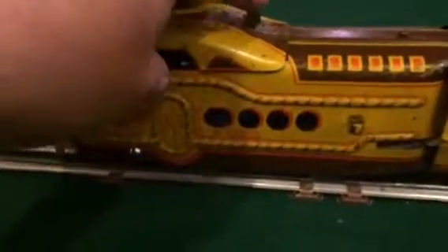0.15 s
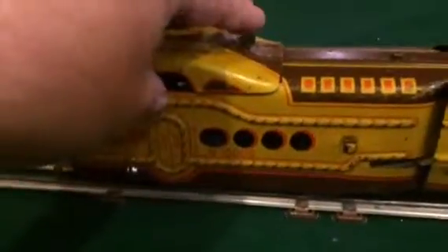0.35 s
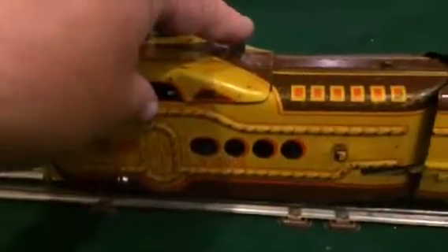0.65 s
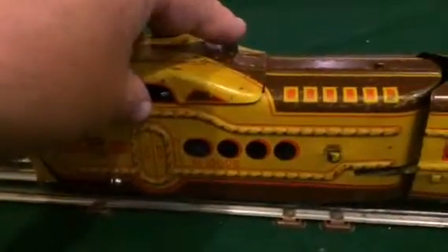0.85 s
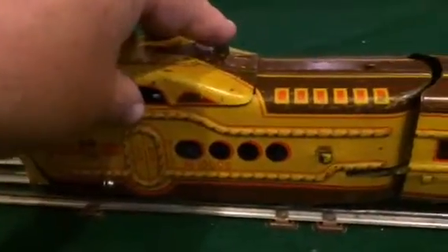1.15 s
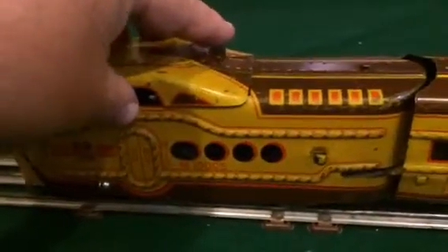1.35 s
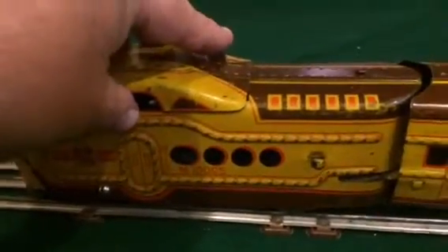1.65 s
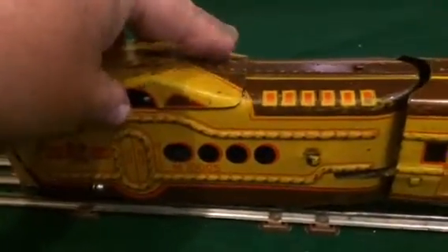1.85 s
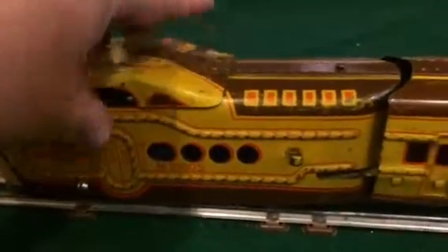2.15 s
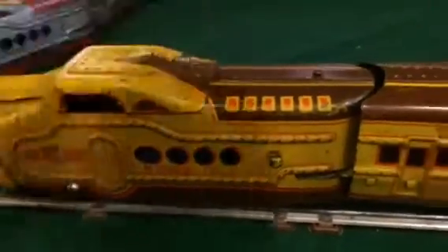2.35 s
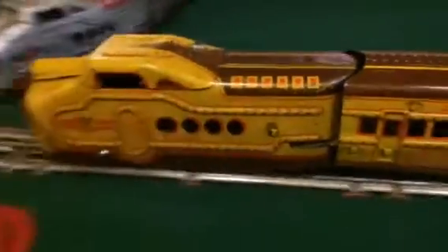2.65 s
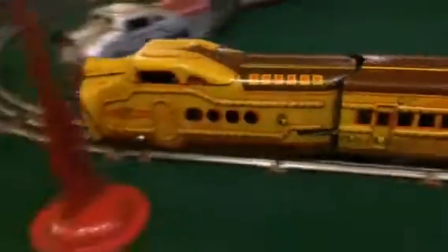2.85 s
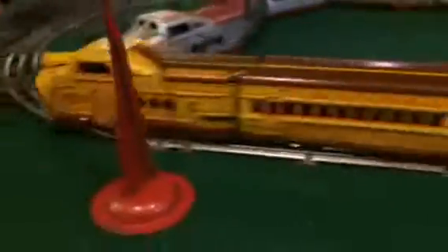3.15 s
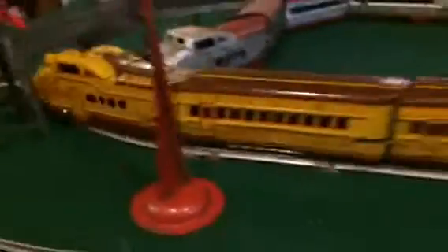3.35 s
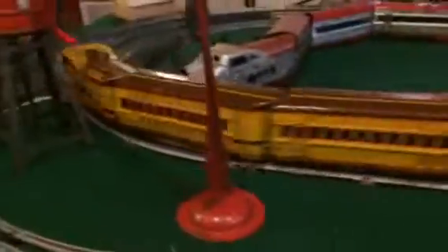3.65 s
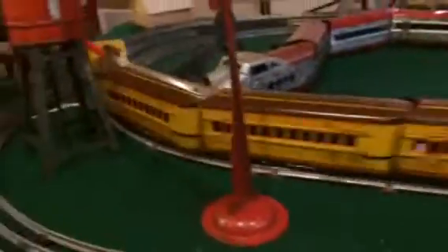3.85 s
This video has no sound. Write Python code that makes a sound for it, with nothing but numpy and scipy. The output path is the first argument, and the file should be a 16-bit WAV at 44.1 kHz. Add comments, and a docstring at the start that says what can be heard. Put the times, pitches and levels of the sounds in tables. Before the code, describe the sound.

Wind-up tin toy train: a sharp brake snap, then clattering, whirring run along metal rails

```python
"""A tin wind-up train on metal track snaps its brake off: quick noisy contacts excite the modes of its shell.
Its couplings and wheels clank, as bursts of two-band noise over the same modes.
Gears and wheels then rattle along the rails, as random trains of tiny impacts, with a low rumble.
Dull bumps are short pulsed tones and decaying low noise.
Behind them lie air noise, mains hum and a faint whine; a short reverberant tail follows the train."""
import sys
import numpy as np
from scipy import signal
from scipy.fft import rfft, irfft, next_fast_len
from scipy.io import wavfile
from scipy.ndimage import uniform_filter1d, map_coordinates

SR = 44100
rng = np.random.default_rng(int(sys.argv[2]) if len(sys.argv) > 2 else 0)


def master_out(mix):
    """Clip the mix to full scale and print it as 16-bit PCM to the path in sys.argv[1]."""
    frames = np.transpose(np.atleast_2d(mix))
    ceiling = np.clip(frames, -1, 1)
    pcm = np.round(ceiling * 32767).astype(np.int16)
    wavfile.write(sys.argv[1], SR, pcm)


N = 176400  # samples: 4 s


def amp(db):
    """Logarithmic level: decibels to amplitude gain."""
    return 10 ** (np.asarray(db) / 20)


def unit(x):
    """Normalization of power: scale to rms 1."""
    return x / np.sqrt(np.mean(x ** 2) + 1e-20)


def along(points, hz):
    """Logarithmic frequency scale: (f/Hz, value) points interpolated along it."""
    f, v = np.transpose(points)
    return np.interp(np.log(hz + 1), np.log(f + 1), v)


def filtered(x, response):
    """Linear filtering: the spectrum of x times a response of frequency."""
    m = next_fast_len(len(x) + 8192)
    spectrum = rfft(x, m) * response(np.fft.rfftfreq(m, 1 / SR))
    return irfft(spectrum, m)[:len(x)]


def coloured(x, colour):
    """Spectral shaping: x filtered by a (f/Hz, level/dB) curve, at rms 1."""
    return unit(filtered(x, lambda hz: amp(along(colour, hz))))


def noise(colour, size):
    """Coloured noise: shaped Gaussian noise of rms 1."""
    return coloured(rng.standard_normal(size), colour)


def wobble(rate):
    """Slow random modulation: a smooth curve with rate knots a second."""
    knots = rng.standard_normal(4096)
    return map_coordinates(knots, [np.arange(N) * rate / SR + 2], mode="wrap")


def fade(t, t60):
    """Exponential decay: amplitude falls by 60 dB in t60 seconds."""
    return np.exp(-np.log(1000) * t / t60)


def onset(t, rise_s):
    """Exponential rise: a contact approaches full force with time constant rise_s."""
    return 1 - np.exp(-t / rise_s)


def add(track, s, sound):
    """Superposition: mix a sound into the track at s seconds."""
    part = track[round(s * SR):][:len(sound)]
    part += sound[:len(part)]


# spectrum of the air noise: f/Hz, level/dB
AIR_COLOUR = [(15, -20.5), (32, -7.5), (60, -1.5), (85, -4), (135, 4), (180, -5.5), (280, -11),
              (350, -15.5), (510, -19), (680, -18), (1200, -28), (1450, -27.5), (1950, -31.5), (3000, -26),
              (3800, -27.5), (5500, -36.5), (6900, -35.5), (8500, -42.5), (15000, -46)]
# partials of the mains hum: f/Hz, rms level/dB
MAINS_HUM = [(59.6, -57.5), (119.3, -58.5), (581, -77)]
# partials of the faint electrical whine: f/Hz, rms level/dB
ELECTRICAL_WHINE = [(3693, -86), (4474, -85.5), (6697, -89)]
AIR_DB = -56


def room_tone(waver_rad=0.27):
    """Additive synthesis over broadband noise: phase-modulated hum, steady whine and soft air."""
    t = np.arange(N) / SR
    tones = np.zeros(N)
    for hz, db in MAINS_HUM:
        tones += amp(db) * np.sin(2 * np.pi * hz * t + waver_rad * wobble(9))
    for hz, db in ELECTRICAL_WHINE:
        tones += amp(db) * np.sin(2 * np.pi * hz * t)
    return amp(AIR_DB) * noise(AIR_COLOUR, N) + np.sqrt(2) * tones  # sqrt(2): rms to peak


# reverberation time of the room: f/Hz, t60/s
ROOM_T60 = [(100, .3), (1000, 0.24), (4000, 0.2), (12000, 0.12)]


def room(x):
    """Reverberation: convolution with a diffuse tail whose treble dies first."""
    hz, t, z = signal.stft(rng.standard_normal(SR // 2), SR, nperseg=256)
    decay = fade(t, along(ROOM_T60, hz)[:, None])
    tail = signal.istft(z * decay, SR, nperseg=256)[1]
    delayed = np.pad(tail, (SR // 200, 0))  # 5 ms before the tail
    return signal.fftconvolve(x, delayed / np.linalg.norm(tail))[:N]


# dull bumps of the train on the table: t/s at the peak, f/Hz, level/dB, half-length/s (to 1/e)
TABLE_BUMPS = [(2.008, 85, -23.5, 0.013), (2.5, 103, -39, 0.0093), (3.3923, 121, -19, .0055),
               (3.393, 837, -27.5, 0.0019), (3.947, 714, -31.5, 0.0031)]
# boxy thuds of the track under the heaviest jolts: t/s, level/dB
TRACK_THUDS = [(1.997, -22), (3.056, -46), (3.39, -37)]
# spectrum of the thuds: f/Hz, level/dB
THUD_SPECTRUM = [(60, 3), (160, -4), (300, -14), (450, -9), (900, -43), (1800, -35), (6000, -70)]
THUD_T60_S = 0.055
STRIKE_S = 0.0014  # rise time constant of thuds and clanks


def bumps():
    """Impulse response of heavy bodies: jolts rock the table as Gaussian tone pulses and knock the track."""
    out, t = np.zeros(N), np.arange(SR // 2) / SR
    for s, hz, db, half in TABLE_BUMPS:
        lag = np.arange(N) / SR - s
        out += amp(db) * np.exp(-(lag / half) ** 2) * np.cos(2 * np.pi * hz * lag)
    for s, db in TRACK_THUDS:
        envelope = onset(t, STRIKE_S) * fade(t, THUD_T60_S)
        add(out, s, amp(db) * envelope * noise(THUD_SPECTRUM, len(t)))
    return out


def chatter(rate, spread_db, t60):
    """Poisson impacts: random tiny metal contacts, rate a second, sum in power to a noise envelope."""
    struck = rng.random(N) < rate / SR
    hits = struck * amp(spread_db * np.clip(rng.standard_normal(N), -2, 2))
    decay = fade(np.arange(SR // 8) / SR, t60)
    power = signal.fftconvolve(hits ** 2, decay ** 2)[:N]
    return unit(np.sqrt(np.abs(power)) * rng.standard_normal(N))


def patchy(x, depth_db):
    """Time-varying resonance: smoothed random gains come and go as the wheels move along the rails."""
    z = signal.stft(x, nperseg=1024)[2]
    field = uniform_filter1d(rng.standard_normal(z.shape), size=3, axis=0)  # across frequency
    field = uniform_filter1d(field, size=9, axis=1)  # across time
    return signal.istft(z * amp(depth_db * unit(field)), nperseg=1024)[1][:N]


# resonances of wheels and rails: f/Hz, bandwidth/Hz, level/dB
RAIL_MODES = [(900, 92, -5), (1162, 29, 6.5), (1527, 120, 1), (3240, 100, -5.5), (4140, 120, -10),
              (4650, 170, -16)]


def rail_response(f):
    """Modal superposition: band-pass resonances of wheels and rails, alternating in sign."""
    total = 0
    for k, (hz, width, db) in enumerate(RAIL_MODES):
        total = total + (-1) ** k * amp(db) * 1j * f * width / (hz * hz - f * f + 1j * f * width)
    return total


# course of the rolling: t/s, wheel rattle level/dB, gear whir level/dB (before GEAR_DB)
ROLL_LEVELS = [(2.2, -77.5, -71), (2.46, -69, -71), (2.53, -62, -58), (2.6, -58, -63), (2.71, -58, -56.5),
               (2.78, -48, -49), (2.82, -53, -59.5), (2.9, -52, -53), (3.02, -47.5, -51),
               (3.16, -42.5, -46.5), (3.271, -39, -46), (3.33, -55, -46), (3.45, -40, -44.5),
               (3.52, -49.5, -45.5), (3.57, -42, -47), (3.68, -42, -44.5), (3.8, -43, -47),
               (4.0, -46, -45.5)]
# spectra of wheels, gears, ticks and rumble: f/Hz, level/dB
WHEEL_SPECTRUM = [(150, -62), (300, -19.5), (480, -10.5), (620, -8), (740, 0), (1100, 2), (1300, -2.5),
                  (1550, 3), (1900, -2), (2400, -15), (3200, -64)]
GEAR_SPECTRUM = [(1300, -24), (2200, -4.5), (2600, -2), (3200, -1.5), (4300, -6), (4800, -6), (5400, -14),
                 (6300, -14), (8000, -24), (11000, -33.5), (15000, -47)]
TICK_SPECTRUM = [(300, -22), (800, 4), (1600, 14), (2300, 1), (3500, 10.5), (4700, -26), (6500, -6.5),
                 (9000, -18.5), (15000, -27)]
RUMBLE_SPECTRUM = [(30, -4), (70, -3.5), (130, 5), (200, -6.5), (400, -18), (800, -51.5)]
ROLL_START_S = 2.1
GEAR_DB = -0.5
RAIL_DB, TICK_DB = -7, -5.5  # relative to wheels and to gears
RUMBLE_DB = -49.5  # at the loudest wheel rattle
RUMBLE_GROWS = 0.24  # dB of rumble per dB of wheel rattle


def rolling():
    """Stochastic impact excitation: wheels and gears chatter, loose parts tick, rails ring, table rumbles."""
    t = np.arange(N) / SR
    s, wheel, gear = np.transpose(ROLL_LEVELS)
    wheel_db, gear_db = np.interp(t, s, wheel), np.interp(t, s, gear)
    wheels = coloured(chatter(rate=480, spread_db=2.8, t60=.045), WHEEL_SPECTRUM)
    rails = unit(filtered(chatter(rate=200, spread_db=3.5, t60=.04), rail_response))
    gears = coloured(chatter(rate=480, spread_db=2.6, t60=.045), GEAR_SPECTRUM)
    ticks = coloured(chatter(rate=70, spread_db=4, t60=.016), TICK_SPECTRUM)
    rattle = amp(wheel_db) * (wheels + amp(RAIL_DB) * rails)
    rattle += amp(gear_db + GEAR_DB) * (gears + amp(TICK_DB) * ticks)
    rumble_db = RUMBLE_DB + RUMBLE_GROWS * (wheel_db - wheel.max())
    rumble = amp(rumble_db) * noise(RUMBLE_SPECTRUM, N)
    fade_in = np.clip((t - ROLL_START_S) / .05, 0, 1)
    return (patchy(rattle, depth_db=1.86) + rumble) * fade_in


# modes of the tin shell: f/Hz, level/dB (before random variation), t60/s (before damping)
SHELL_MODES = [(720, -10, .1), (882, 1, .12), (1162, -2, .12), (1523, 1, .1), (1700, -6, .1),
               (2107, -1, .13), (2540, -4, .12), (2783, -2, .12), (2838, -2, .11), (2955, -1, .12),
               (3055, -2, .11), (3356, -2, .11), (3464, -2, .11), (3662, -1, .12), (3852, -4, .1),
               (4027, -6, .11), (4846, -9, .09)]


def shell_ring(t, damping):
    """Modal synthesis: decaying shell modes, newly balanced at every blow; damping divides their t60."""
    ring = np.zeros(len(t))
    for k, (hz, db, t60) in enumerate(SHELL_MODES):
        level = amp(db + 2 * rng.normal())
        ring += (-1) ** k * level * fade(t * damping, t60) * np.sin(2 * np.pi * hz * t)
    return ring


# clanks of couplings and wheels: t/s, level/dB, treble level/dB (relative to body), t60/s of the clatter
CLANK_EVENTS = [(.074, -59, -2.5, 0.15), (.335, -62.5, -12, 0.15), (1.253, -64.5, 2, .06),
                (1.725, -62.5, -4, 0.18), (1.92, -61, -9, 0.085), (2.108, -55, -3.5, 0.18),
                (2.186, -43, -5.5, 0.047), (2.196, -45.5, -3.5, 0.084), (2.245, -63, 6, 0.12),
                (2.492, -47, -13, 0.085), (2.514, -54.5, -1.5, 0.25), (2.545, -52, 14, 0.044),
                (2.582, -57, -26, 0.047), (2.626, -43.5, -5, 0.063), (2.672, -30, -9.5, 0.06),
                (2.681, -42, -4.5, 0.1), (2.746, -31.5, -13, 0.082), (2.767, -45, -6, 0.094),
                (2.791, -43, 4.5, 0.061), (2.846, -41, 4.5, 0.031), (2.904, -47, -11, 0.21),
                (2.942, -28, -3, 0.054), (3.052, -32, 0.5, 0.16), (3.062, -37.5, 3, 0.066),
                (3.116, -43, -2, 0.23), (3.176, -43.5, 3.5, .1), (3.216, -51.5, 13.5, 0.062),
                (3.364, -33, -4, 0.15), (3.371, -30, -4, .06), (3.387, -32.5, -7.5, 0.098),
                (3.412, -37.5, 4, 0.042), (3.455, -39, -7, 0.33), (3.553, -43, 0, 0.13),
                (3.579, -47, 12.5, 0.027), (3.645, -36.5, -13, .04), (3.664, -32.5, -8, 0.099),
                (3.731, -41, 2.5, 0.2), (3.86, -35, -5.5, 0.15), (3.944, -31, -3, 0.01)]
# spectra of the clatter's body and treble: f/Hz, level/dB
BODY_SPECTRUM = [(100, -10), (300, -15.5), (550, -12.5), (720, -6.5), (1150, -10), (1600, -2), (2200, -10),
                 (3200, -13), (6000, -56)]
TREBLE_SPECTRUM = [(1200, -34), (2200, -25), (3000, 5), (4200, 5), (5200, -5), (6400, -9), (8000, -23.5),
                   (11000, -27), (15000, -35)]
CLANK_RING_DB = -23  # shell ring relative to the clatter's body


def clanks():
    """Inelastic collision: loose tin parts clatter as decaying noise, more or less bright, over the ring."""
    out, t = np.zeros(N), np.arange(SR // 2) / SR
    for s, db, treble_db, t60 in CLANK_EVENTS:
        body = noise(BODY_SPECTRUM, len(t))
        treble = amp(treble_db) * noise(TREBLE_SPECTRUM, len(t))
        clatter = (body + treble) * fade(t, t60)
        ring = amp(CLANK_RING_DB) * shell_ring(t, damping=0.98)
        add(out, s, amp(db) * onset(t, STRIKE_S) * (clatter + ring))
    return out


def dying(colour, t60s):
    """Frequency-dependent damping: a noise burst whose every band dies at its own speed."""
    hz, t, z = signal.stft(noise(colour, SR // 2), SR, nperseg=128)
    decay = fade(t, along(t60s, hz)[:, None])
    return signal.istft(z * decay, SR, nperseg=128)[1][:SR // 2]


# contacts of the brake lever: t/s, level/dB, ring level/dB (relative to the crack)
BRAKE_CONTACTS = [(1.99, -20, -25), (1.9928, -20, -17), (1.9963, -11, -16.5), (2.001, -17.5, -16),
                  (2.008, -24, -15), (2.033, -42.5, -28)]
# spectrum of the crack: f/Hz, level/dB
CRACK_SPECTRUM = [(100, -8.5), (250, -9), (500, -28), (680, -9.5), (870, -1), (1020, -10), (1170, -1),
                  (1350, -11.5), (1550, 1), (1850, -6.5), (2300, -1.5), (3000, 0), (3700, 6), (4600, -3),
                  (5400, -6), (6000, -1.5), (7200, -9.5), (9500, -17), (12300, -20), (15000, -25)]
# decay of the crack: f/Hz, t60/s
CRACK_DECAY = [(300, 0.14), (1500, 0.062), (4000, 0.023), (12000, 0.021)]
CRACK_RISE_S = 0.00063  # time constant


def brake():
    """Impact excitation: the lever snaps over in a few quick contacts that crack and ring the shell."""
    out, t = np.zeros(N), np.arange(SR // 2) / SR
    for s, db, ring_db in BRAKE_CONTACTS:
        crack = dying(CRACK_SPECTRUM, CRACK_DECAY)
        ring = amp(ring_db) * shell_ring(t, damping=1.5)
        add(out, s, amp(db) * onset(t, CRACK_RISE_S) * (crack + ring))
    return out


ROOM_DB = -15  # gain of the reverberant tail


def scene():
    """Superposition: the direct train, its reverberation and the room tone, in one channel."""
    train = brake() + clanks() + bumps() + rolling()
    return (train + amp(ROOM_DB) * room(train) + room_tone())[None]


BOOM_HZ, TOP_HZ = 35.4, 15400  # band edges


def record(dry):
    """Band limitation: thin the deep bass and cut steeply above the top edge."""
    def response(hz):
        bass = hz ** 2 / np.sqrt(hz ** 4 + BOOM_HZ ** 4)
        return bass / np.sqrt(1 + (hz / TOP_HZ) ** 200)
    return np.array([filtered(x, response) for x in dry])


dry = scene()
out = record(dry)
master_out(out)
```